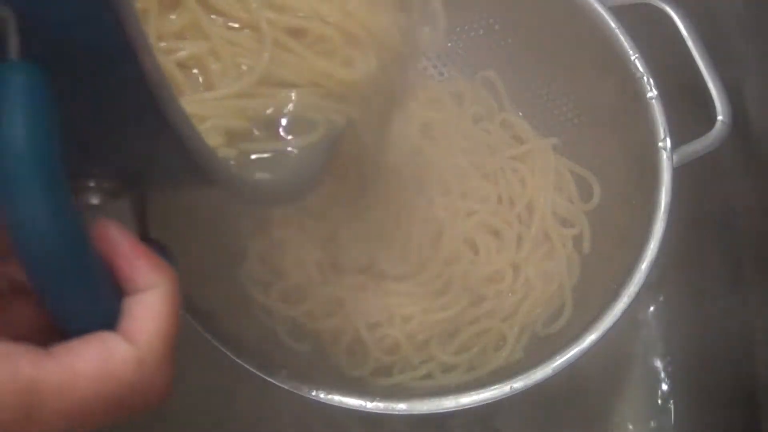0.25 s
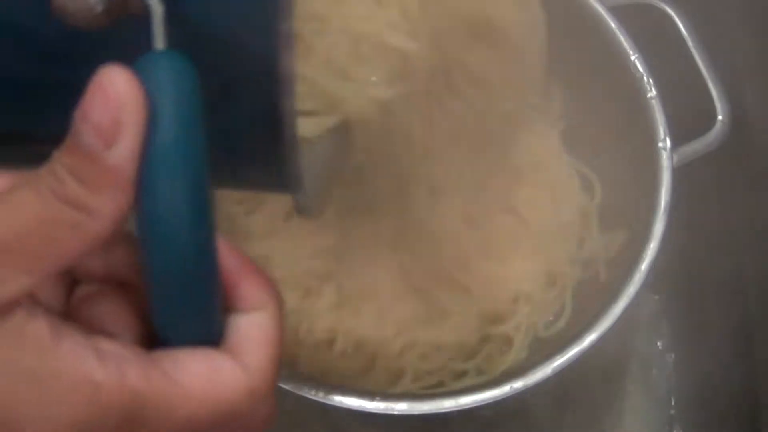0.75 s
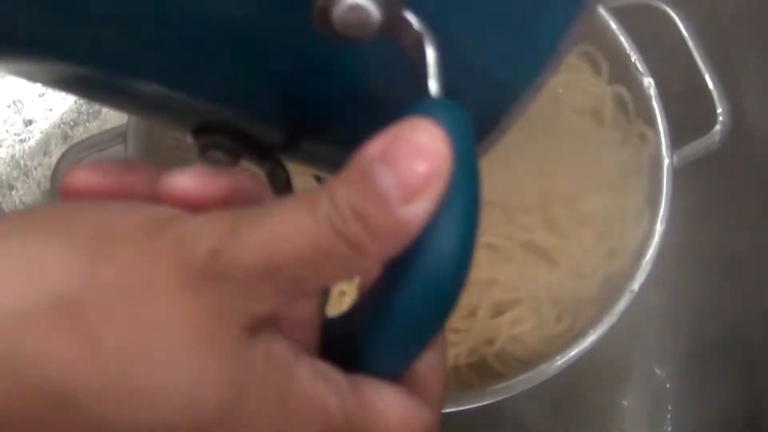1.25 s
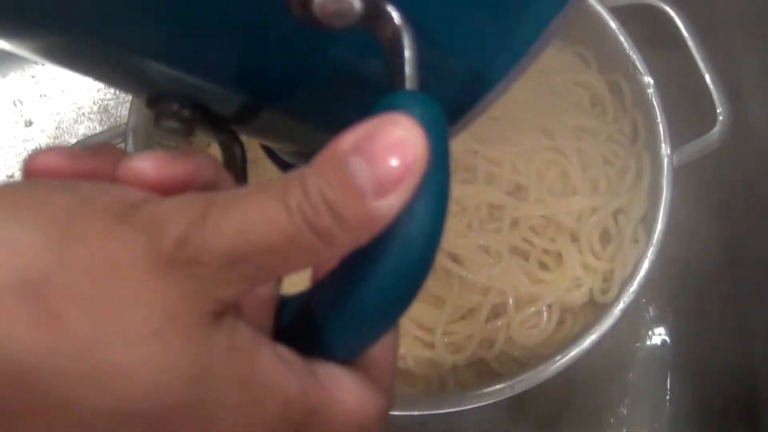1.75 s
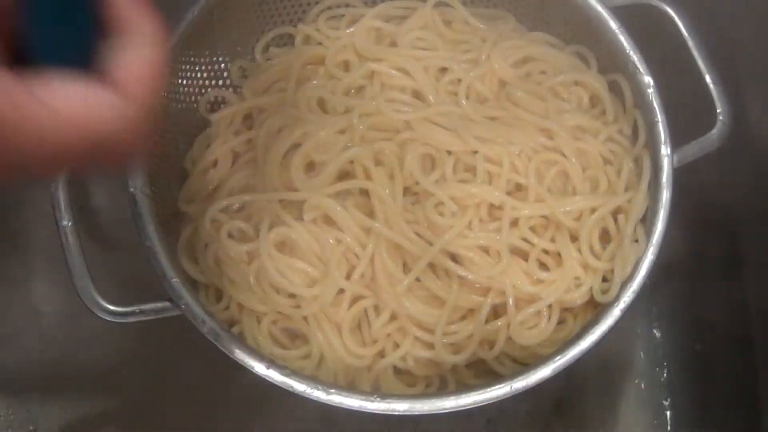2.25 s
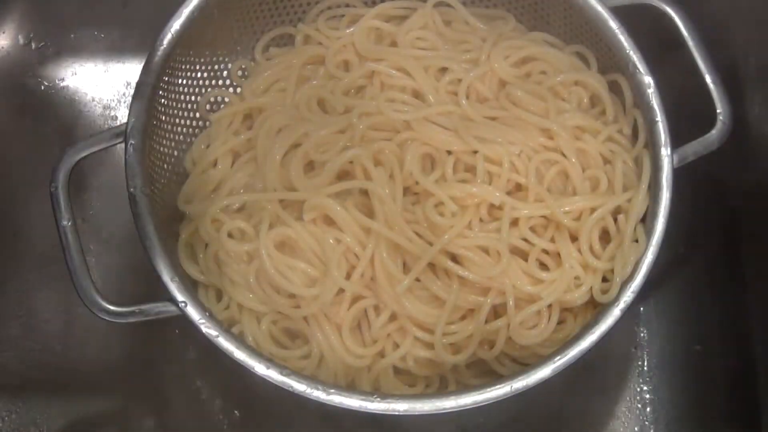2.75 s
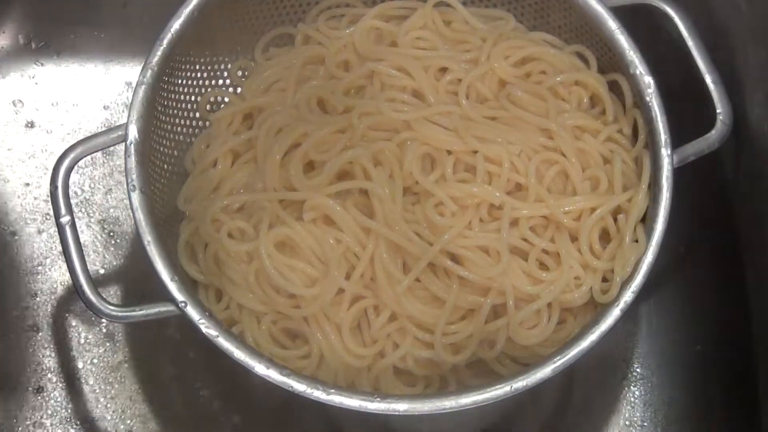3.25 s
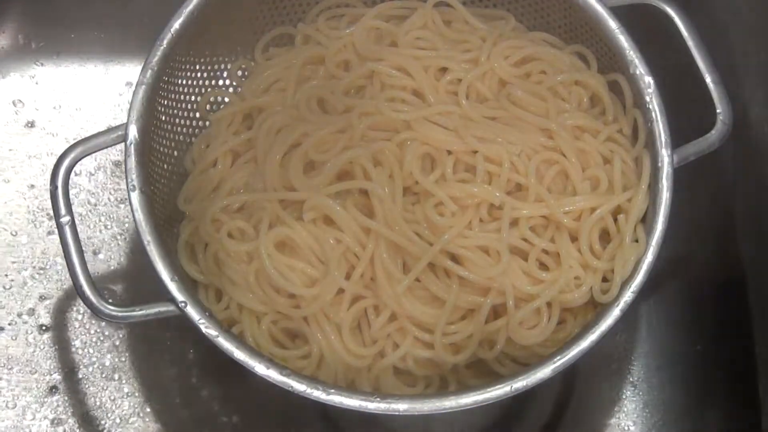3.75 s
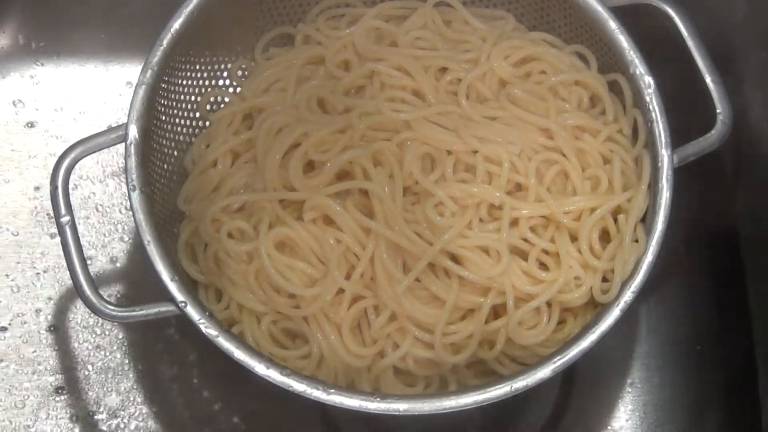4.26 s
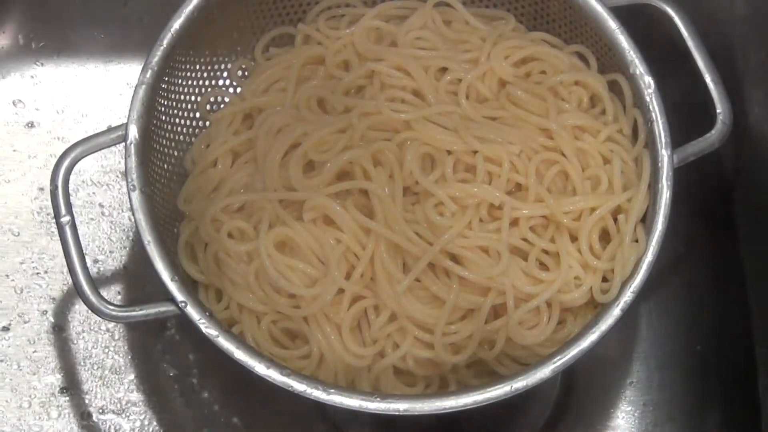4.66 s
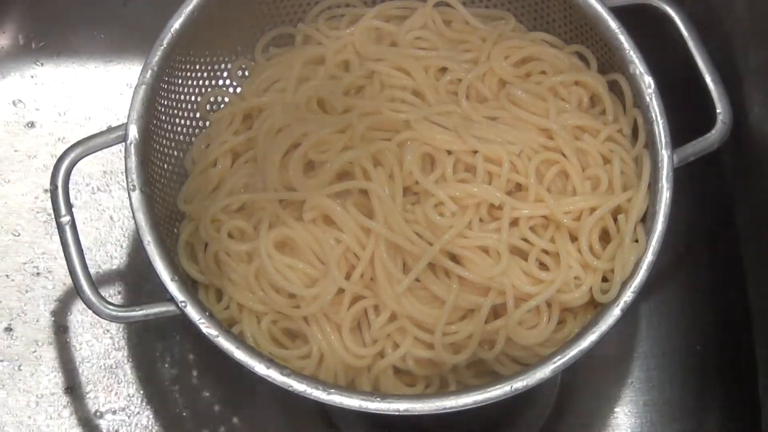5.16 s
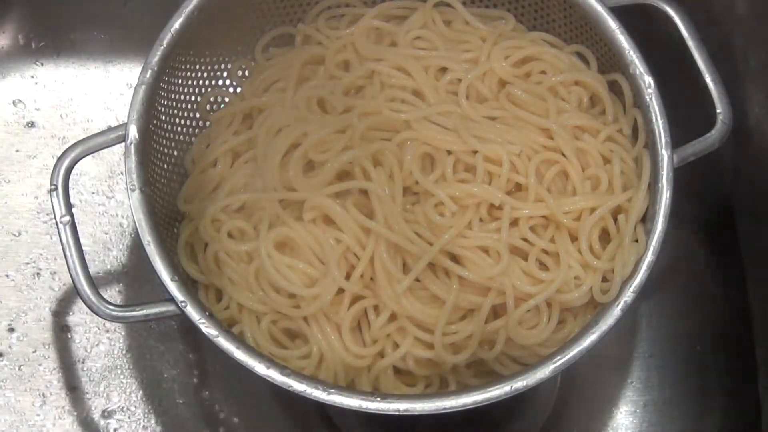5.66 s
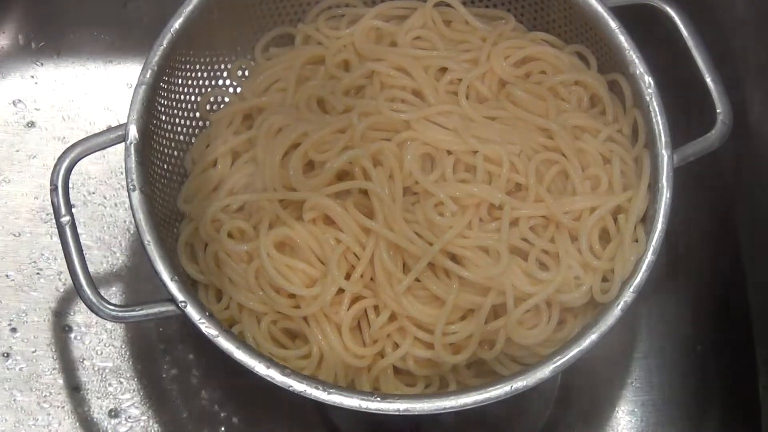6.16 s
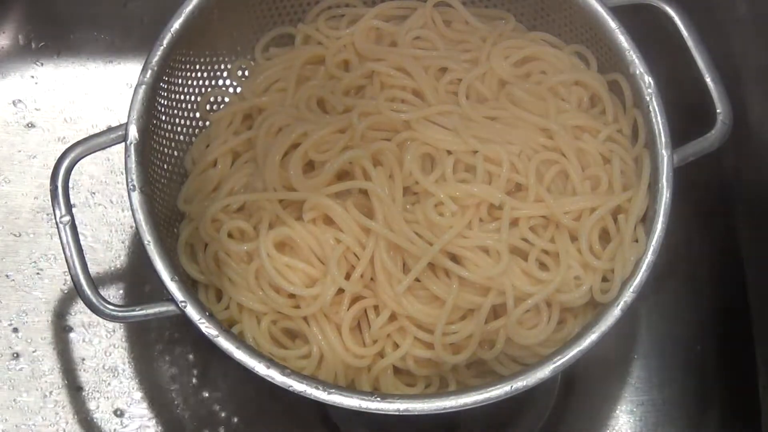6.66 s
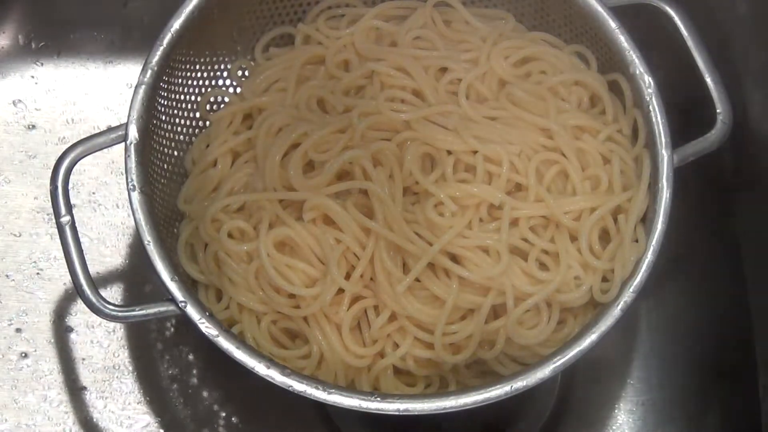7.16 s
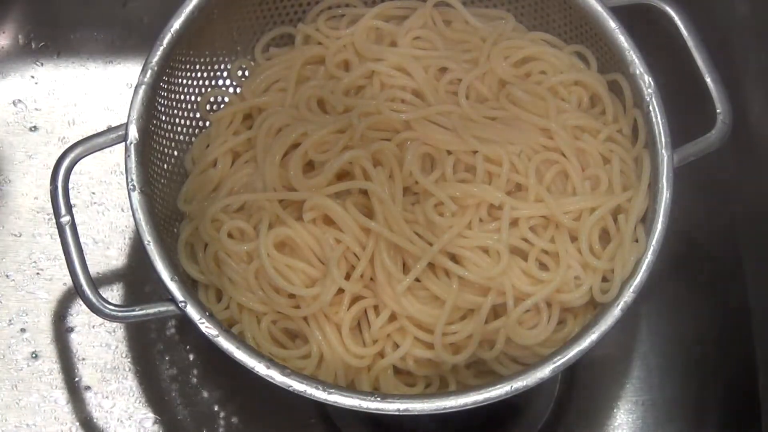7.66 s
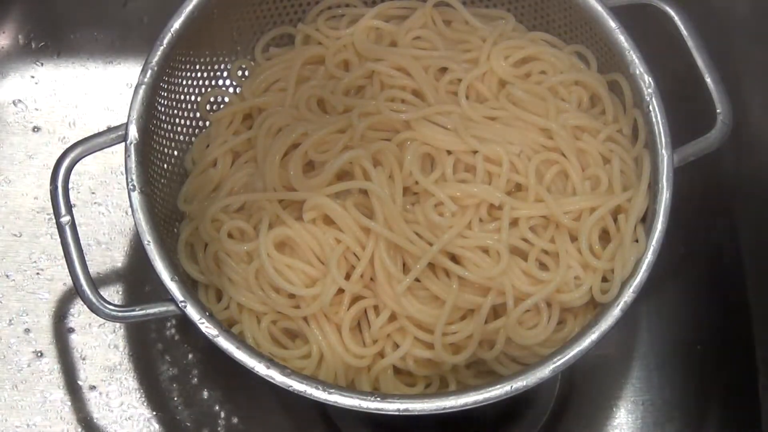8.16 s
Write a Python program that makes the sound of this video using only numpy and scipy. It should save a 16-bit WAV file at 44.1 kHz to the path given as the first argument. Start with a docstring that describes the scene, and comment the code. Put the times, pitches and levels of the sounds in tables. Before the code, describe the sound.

Close splashing as noodles are drained into a metal sink, followed by pattering run-off, a short scrape, faint drips and a pan clank.

```python
"""Hot water and noodles pour from a pot into a colander in a steel kitchen sink, close to one microphone.
The stream splashes, traps bubbles and throws spray; the run-off drums and pings on the thin basin.
At about 4.4 s the pot scrapes down on the counter. Faint dripping and shuffling follow over the
room tone, until a hard knock sets a pan ringing at 8.4 s. A limiter ducks the loudest peaks."""
import sys
import numpy as np
from scipy import signal
from scipy.fft import rfft, irfft, next_fast_len
from scipy.io import wavfile
from scipy.ndimage import uniform_filter1d, minimum_filter1d

SR = 44100
rng = np.random.default_rng(int(sys.argv[2]) if len(sys.argv) > 2 else 0)


def put_to_file(sound):
    """Save the sound as 16-bit audio at rate SR, in the file named by the first command-line argument."""
    columns = np.atleast_2d(sound).T  # one column per channel
    safe = np.clip(columns, -1, 1)
    whole_steps = np.round(safe * 32767)
    wavfile.write(sys.argv[1], SR, whole_steps.astype(np.int16))


N = 371322


def amp(db):
    """Decibels to gain."""
    return 10 ** (np.asarray(db) / 20)


def rms_one(x):
    """Scaled to unit rms."""
    return x / np.sqrt(np.mean(x ** 2) + 1e-20)


def filtered(x, order, hz, kind="band"):
    """Band-pass, or another kind of filter, with edges at hz."""
    return signal.sosfilt(signal.butter(order, hz, kind, fs=SR, output="sos"), x)


def gains(rows):
    """Each dB column of a curve as a gain in time, fading out within 30 ms beyond either end."""
    s, *columns = np.transpose(rows)
    s = np.r_[s[0] - .03, s, s[-1] + .03]
    return [amp(np.interp(np.arange(N) / SR, s, np.r_[-120, db, -120])) for db in columns]


def swells(rows, fall_db_s):
    """Each row climbs 20 dB in its rise time, peaks and dies away; one gain in time per dB column."""
    s, rise_s, *columns = np.transpose(rows)
    since = np.arange(0, N + 40, 40) / SR - s[:, None]
    shape = amp(np.where(since < 0, 20 * since / rise_s[:, None], -fall_db_s * since))
    return [np.interp(np.arange(N) / 40, np.arange(shape.shape[1]), amp(db) @ shape) for db in columns]


def drift(hz):
    """Slow random wander: noise low-passed twice at hz; rms 1."""
    pole = np.exp(-40 * np.pi * hz / SR)
    noise = rng.standard_normal(N // 20 + 4002)   # one value every 20 samples
    slow = signal.lfilter([1], [1, -2 * pole, pole * pole], noise)[4000:]
    return np.interp(np.arange(N) / 20, np.arange(len(slow)), rms_one(slow))


def grains(per_s, spread_db):
    """Random clicks, a few much larger than the rest; rms 1."""
    sizes = amp(spread_db * np.minimum(rng.exponential(1, N), 5)) * rng.choice([-1, 1], N)
    return rms_one(sizes * (rng.random(N) < per_s / SR))


def colour(x, spectrum):
    """Gives a flat input the spectrum of a table; rms 1."""
    size = next_fast_len(N)
    hz, db = np.transpose(spectrum)
    bin_hz = np.maximum(np.arange(size // 2 + 1) * SR / size, 1)
    shape = amp(np.interp(np.log(bin_hz), np.log(hz), db, left=-90, right=-90))
    return rms_one(irfft(rfft(x, size) * shape, size)[:N])


def ring(clicks, hz, t60):
    """A unit click sets a sine of height 1 ringing."""
    decay, angle = amp(-60 / (t60 * SR)), 2 * np.pi * hz / SR
    return signal.lfilter([0, np.sin(angle)], [1, -2 * decay * np.cos(angle), decay ** 2], clicks + 1e-18)


def struck(modes, times, peak_db, scatter_db, contact_s, swell_s=0, spot_hz=None):
    """Every blow reaches each mode at its own moment and strength; modes near spot_hz are favoured."""
    starts, out = (np.asarray(times) * SR).astype(int), np.zeros(N)
    chance = rng.standard_normal((len(starts), 2, len(modes)))
    for k, (hz, db, t60) in enumerate(modes):
        clicks = np.zeros(N + SR)
        strength = amp(peak_db + db + scatter_db * chance[:, 0, k])
        if spot_hz is not None:
            strength *= amp(-8 * np.abs(np.log2(hz / spot_hz)))   # 8 dB less per octave away
        late = (np.abs(chance[:, 1, k]) * contact_s * SR).astype(int)
        clicks[starts + late] = strength * np.sign(chance[:, 1, 0])
        out += ring(clicks[:N], hz, t60)
        if swell_s:
            out -= ring(clicks[:N], hz, min(swell_s, t60 / 2))   # softens the attack
    return out


def pattered(modes, per_s, spread_db, shared):
    """Drops land all over the steel: each mode shares the common drops and has its own too; rms 1."""
    drops = grains(per_s, spread_db) * amp(3.3 * drift(14))   # in clumps
    own = [np.roll(drops, shift) for shift in rng.integers(SR // 4, N, len(modes))]
    return rms_one(sum(amp(db) * ring((shared * drops + near) * rng.standard_normal(N), hz, t60)
                       for (hz, db, t60), near in zip(modes, own)))


def fizz(spectrum, per_s, spread_db, cycles, patchy_db, bed_db):
    """Droplets dealt to ten pitches, each ringing a few cycles, in patches on a bed of hiss; rms 1."""
    drops, dealt, together = grains(per_s, spread_db), rng.integers(0, 10, N), drift(33)
    rings = np.zeros(N)
    for k, hz in enumerate(np.geomspace(spectrum[1][0], spectrum[-2][0], 10)):
        patches = amp(patchy_db * (together + drift(46)))
        rings += patches * rms_one(ring(drops * (dealt == k), hz, cycles / hz)) * np.sqrt(hz)
    bed = amp(bed_db + patchy_db * together) * rng.standard_normal(N)
    return colour(rms_one(rings) + bed, spectrum)


def pops(rows, cycles, splat_s, rise):
    """Each row is a wet splat and a bubble whose pitch climbs as it nears the surface."""
    out, t = np.zeros(N + 1000), np.arange(1000) / SR
    for s, bubble_db, bubble_hz, splat_db, splat_hz in rows:
        start, turns = int(s * SR), bubble_hz * t
        bubble = np.sin(2 * np.pi * turns * (1 + rise * turns / cycles)) * amp(-60 * turns / cycles)
        splat = filtered(rng.standard_normal(len(t)), 2, [splat_hz / 2, splat_hz * 1.32])
        splat *= np.exp(-t / splat_s)
        out[start:start + len(t)] += amp(bubble_db) * bubble + amp(splat_db) * splat
    return out[:N]


# The microphone's hiss and the still kitchen. Each row: frequency in Hz, relative density in dB.
MIC_SPECTRUM = [(1500, -45), (2700, 0), (6500, -5), (9000, -6.5), (11500, -6), (14800, -16), (15900, -3)]
ROOM_SPECTRUM = [(12, -49), (20, -8), (81, -7), (264, 3.5), (369, -8.5), (455, -5), (736, -7.5), (835, -2),
                 (947, -11.5), (1070, -3), (1810, -4), (3000, -20.5), (3900, -55), (6600, -120)]


def room_tone():
    """Low room tone all round, with microphone hiss and a faint steady whine at the top."""
    hiss = amp(-65) * colour(rng.standard_normal(N), MIC_SPECTRUM)
    whine = amp(-79) * rms_one(filtered(rng.standard_normal(N), 2, [15400, 15760]))
    return hiss + whine + amp(-57) * colour(rng.standard_normal(N), ROOM_SPECTRUM)


# Bustle about the kitchen. Each row: time in seconds, rustle level in dB.
BUSTLE_CURVE = [(5.0, -65), (5.25, -60), (5.55, -84), (6.45, -78), (6.8, -56.5), (7.2, -54.5), (7.4, -59),
                (7.8, -56), (8.4, -60)]
# Single steps and moves. Each row: peak time and rise time in seconds, footfall, rustle and swish in dB.
MOVES = [(5.685, 0.0044, -48, -47, -52), (6.06, .02, -70, -64, -67), (6.6, 0.12, -51.5, -56.5, -59),
         (6.85, 0.039, -47.5, -74, -70), (7.045, 0.019, -50, -53, -66), (7.29, 0.13, -55, -63, -63),
         (7.46, 0.05, -49, -57, -61), (7.9, 0.036, -47, -58, -61), (8.155, 0.076, -50, -62, -64)]


def movement():
    """Someone moves about: gains in time for footfall, rustle and swish."""
    bustle, = gains(BUSTLE_CURVE)
    footfall, rustle, swish = swells(MOVES, fall_db_s=172)
    return footfall + amp(0.5) * bustle, rustle + bustle, swish + amp(-2) * bustle


# Feet on the floor and moving cloth. Each row: frequency in Hz, relative density in dB.
FOOT_SPECTRUM = [(24, -53), (40, -20), (86, -37), (108, -13), (168, 4), (199, -9), (271, 2.5), (359, -20.5),
                 (421, -15), (494, -2.5), (750, -45), (980, -54), (1650, -120)]
CLOTH_SPECTRUM = [(350, -74), (600, 16), (728, 4), (850, 12), (1210, 6.5), (1370, 12), (2140, 2.5),
                  (2350, 4), (2800, -28), (3640, -41), (6160, -120)]


def shuffling(footfall, rustle):
    """Soft steps are sparse low bumps; cloth rubs in dense small catches."""
    feet = footfall * colour(grains(per_s=120, spread_db=2), FOOT_SPECTRUM)
    return feet + rustle * colour(grains(per_s=3000, spread_db=2.9), CLOTH_SPECTRUM)


# Steam and trickle in the colander. Each row: time in seconds, level in dB.
TRICKLE_CURVE = [(1.7, -71), (2.4, -70), (3.6, -61.5), (3.75, -58), (4.25, -62), (4.8, -60.5), (5.05, -76)]
# Brief spurts in it. Each row: peak time and rise time in seconds, peak level in dB.
TRICKLE_SPURTS = [(1.86, .04, -64), (2.63, 0.054, -56.5), (2.86, 0.033, -67), (4.1, 0.039, -64),
                  (4.42, 0.06, -44)]
# Its fine, bright fizz. Each row: frequency in Hz, relative density in dB.
TRICKLE_SPECTRUM = [(1350, 2), (2300, -5.5), (2870, -9.5), (3600, -8.5), (4380, -13.5), (6690, -10.5),
                    (15000, 0)]


def trickle(swish):
    """Water seeps off the noodles and stray droplets burst; the swish of movement shares the fizz."""
    level = swish + gains(TRICKLE_CURVE)[0] + swells(TRICKLE_SPURTS, fall_db_s=149)[0]
    seep = fizz(TRICKLE_SPECTRUM, per_s=9000, spread_db=3.6, cycles=6, patchy_db=1, bed_db=-41)
    strays = fizz(TRICKLE_SPECTRUM, per_s=250, spread_db=3.2, cycles=6, patchy_db=0.96, bed_db=-30)
    return level * seep + amp(-67) * strays


# Drops among the noodles. Each row: start in seconds, relative level in dB, pitch in Hz.
NOODLE_DRIPS = [(1.8539, -49, 7010), (1.8818, -48.5, 7080), (2.2709, -46.5, 3840), (2.3562, -50, 7450),
                (2.398, -49, 3840), (2.8185, -48, 3510), (2.8523, -44, 3620), (2.859, -41.5, 4100),
                (2.9753, -46, 3800), (3.122, -46, 4650), (3.778, -54, 4060), (4.1084, -47, 5900),
                (4.412, -43, 3950), (5.781, -50, 6900), (6.0563, -44, 4060), (7.383, -44, 6500),
                (7.518, -42, 4180), (7.871, -35, 3880), (7.895, -45, 3760), (7.971, -50.5, 7030),
                (8.058, -45, 3520), (8.168, -48, 3630), (8.3015, -46, 8050)]


def drips():
    """Single drops burst with a tiny high bubble and a splat."""
    s, db, hz = np.transpose(NOODLE_DRIPS)
    bursts = np.c_[s, db - 4, hz, db + 1.5, 1.1 * hz]
    return pops(bursts, cycles=45, splat_s=0.004, rise=0.15)


# A wet swish close by. Its row: peak time and rise time in seconds, peak level in dB.
SQUELCH_SWELL = [(7.57, 0.075, -41)]
# Its colour. Each row: frequency in Hz, relative density in dB.
SQUELCH_SPECTRUM = [(350, -40), (600, -10), (812, -2.5), (1510, -5.5), (1910, -1.5), (2130, -6),
                    (2660, 0.5), (2880, -5), (3510, -4), (14000, -20)]


def squelch():
    """One soft swell of hiss and droplets."""
    level, = swells(SQUELCH_SWELL, fall_db_s=124)
    return level * fizz(SQUELCH_SPECTRUM, per_s=5000, spread_db=1.7, cycles=11, patchy_db=0.58, bed_db=5)


# The pot dragged onto the counter. Each row: time in seconds, rumble in dB, rasp in dB.
SCRAPE_CURVE = [(4.3, -58, -64), (4.338, -38, -53.5), (4.418, -22.5, -26), (4.485, -23, -37),
                (4.512, -36.5, -46), (4.62, -45, -56)]
# The colours of the scrape. Each row: frequency in Hz, relative density in dB.
RUMBLE_SPECTRUM = [(71, -29), (120, -23), (276, -1.5), (429, -15), (491, -7.5), (864, -14), (1010, -62),
                   (1400, -18), (1820, -42), (3080, -120)]
RASP_SPECTRUM = [(710, -44), (1200, -8), (1670, 9), (2000, 1), (2180, -12), (2970, -5), (3420, -11.5),
                 (4010, -8.5), (5200, -38), (6500, -27), (13000, -60)]


def pot_scrape():
    """The rim skids in dense uneven slips."""
    rumble, rasp = gains(SCRAPE_CURVE)
    slips = grains(per_s=2500, spread_db=2.2) * amp(1.5 * drift(64))
    return rumble * colour(slips, RUMBLE_SPECTRUM) + rasp * colour(np.roll(slips, SR), RASP_SPECTRUM)


# A blow on the pan and its bounces. Each row: start in seconds, level in dB.
PAN_BLOWS = [(8.3945, -8), (8.3985, -20), (8.4015, -20), (8.410, -15)]
# The pan's modes. Each row: frequency in Hz, relative level in dB, seconds to fall 60 dB.
PAN_MODES = [(140, -14, .2), (280, -2, .1), (388, -2, .6), (535, -8, .2), (727, -7, .3), (860, -8, .05),
             (970, -9, .3), (1357, 1, .8), (1997, 0, .06), (2385, -10, .04), (3149, -14, .3),
             (3618, -9, .05), (4231, -15, .1), (4533, -14, .04), (5626, -11, .05), (6428, -13, .08),
             (8500, -26, .05), (11000, -30, .05)]


def pan_knock():
    """The pan rings, and its rim rattles on what it hits."""
    s, blow_db = np.transpose(PAN_BLOWS)
    since = np.arange(N) / SR - s[0]
    fade = (since > 0) * amp(-15.5 - 170 * np.maximum(since, 0))
    rattle = filtered(fade * grains(per_s=5600, spread_db=5), 2, [700, 7500])
    pan = struck(PAN_MODES, s, blow_db, scatter_db=0.48, contact_s=0.00035, swell_s=0.0015)
    return filtered(pan, 3, 110, "high") + rattle   # the knock carries no deep bass


# Run-off under the colander. Each row: time in seconds, drumming in dB, metallic ring in dB.
RUNOFF_CURVE = [(0.0, -34, -40), (0.55, -29.5, -41.5), (0.8, -39, -37), (0.99, -30.5, -42),
                (1.32, -41, -40.5), (1.55, -31.5, -43), (1.9, -40.5, -45), (2.15, -25.5, -41.5),
                (2.45, -40.5, -44.5), (2.7, -36, -41.5), (3.0, -36, -47.5), (3.43, -31, -38),
                (3.58, -41, -46.5), (3.81, -34, -44.5), (4.2, -40, -43.5), (4.47, -33, -40),
                (4.6, -44.5, -44), (4.76, -49.5, -52), (5.45, -68, -76)]
# Heavy gushes that thump the sink. Each row: time in seconds, relative level in dB.
BASIN_GUSHES = [(0.124, -15), (0.211, -19.5), (0.285, -21), (0.342, -16.5), (0.438, -27), (0.478, -17),
                (0.546, -17), (0.615, -19), (0.801, -20), (0.845, -13.5), (0.909, -18.5), (0.975, -18.5),
                (1.09, -23), (1.249, -18), (1.385, -14.5), (1.477, -22), (1.533, -14), (1.828, -16),
                (2.093, -9.5), (2.208, -20), (2.296, -15.5), (2.51, -9.5), (2.614, -19), (2.68, -20),
                (2.864, -21), (2.965, -19.5), (3.231, -31), (3.367, -10), (3.446, -18), (3.544, -15.5),
                (3.621, -19), (3.697, -20.5), (3.755, -18), (3.848, -16.5), (4.294, -18), (4.358, -12),
                (4.437, -14), (4.652, -14), (4.667, -15.5)]
# Hard drops on the steel. Each row: start in seconds, relative level in dB, favoured pitch in Hz.
HARD_DROPS = [(0.788, -27.5, 622), (1.837, -28, 856), (1.973, -27.5, 850), (2.066, -19, 931),
              (2.088, -17.5, 800), (2.192, -21.5, 861), (2.268, -39, 842), (2.51, -17, 845),
              (2.697, -38, 851), (2.726, -25, 864), (2.796, -24, 834), (2.867, -28.5, 875),
              (2.945, -31, 848), (2.973, -24.5, 860), (3.151, -28.5, 840), (3.237, -25.5, 842),
              (3.365, -24, 953), (3.385, -18.5, 980), (3.414, -33, 864), (3.451, -17, 875),
              (3.545, -30, 536), (3.622, -27, 905), (3.727, -19.5, 880), (3.866, -27.5, 860),
              (3.894, -23, 850), (3.994, -38, 867), (4.082, -24.5, 850), (4.295, -24, 836),
              (4.481, -16, 860)]
# Low modes of the basin's panels, then higher ones of its walls and the colander.
# Each row: frequency in Hz, relative level in dB, seconds to fall 60 dB.
PANEL_MODES = [(133.8, -6.5, 0.25), (140.6, -1.5, 0.14), (192, 0, 0.063), (216.9, -0.5, 0.16),
               (267, -8.5, 0.095)]
WALL_MODES = [(419.4, -11, 0.083), (511, -9, 0.048), (541.8, -4, 0.084), (838, -3, 0.11),
              (856.6, -3.5, 0.13), (887, -6, 0.071), (963, -5.5, 0.035), (1053, -19, 0.13),
              (1119.5, -13, 0.17), (1176, -9, 0.044), (1640, -13.5, 0.061), (1984, -13, 0.032)]


def basin():
    """Thin steel drummed and pinged by the water that runs through the colander."""
    drumming, ringing = gains(RUNOFF_CURVE)
    swell_s, lead_s = 0.008, 0.004   # water lands softly, so the ring builds gently; gushes are struck a few ms ahead of their listed times
    gush_s, gush_db = np.transpose(BASIN_GUSHES)
    panels = drumming * pattered(PANEL_MODES, per_s=400, spread_db=1.8, shared=0.8)
    panels += struck(PANEL_MODES, gush_s - lead_s, gush_db - 9.5,
                     scatter_db=2.75, contact_s=0.0012, swell_s=swell_s)
    drop_s, drop_db, spot_hz = np.transpose(HARD_DROPS)
    walls = ringing * pattered(WALL_MODES, per_s=500, spread_db=2.8, shared=0.6)
    walls += struck(WALL_MODES, drop_s, drop_db - 2.5,
                    scatter_db=2.5, contact_s=0.0015, swell_s=swell_s, spot_hz=spot_hz)
    # each hard drop has two smaller ones close behind
    follower_s = (drop_s[:, None] + rng.uniform(0.008, 0.06, (len(drop_s), 2))).ravel()
    walls += struck(WALL_MODES, follower_s, np.repeat(drop_db, 2) - 16.5,
                    scatter_db=4, contact_s=0.001, swell_s=swell_s)
    panels = filtered(panels, 7, [113, 380])   # small panels radiate nothing below their lowest mode
    # a heavy drop at 2.09 s shakes the counter
    thud = struck([(55, 0, 0.13)], drop_s[4:5], drop_db[4:5] - 24, scatter_db=0, contact_s=0)
    return thud + panels + filtered(walls, 3, [400, 2200])


# The stream in the sink. Each row: time in seconds, splash in dB, spray in dB against the splash.
POUR_CURVE = [(0.0, -44, 6), (0.25, -40, -2.5), (0.3, -49, 4), (0.57, -46, 1.5), (0.62, -37.5, 0),
              (1.17, -39.5, -4.5), (1.28, -44, -1), (1.484, -54, 1.5), (1.62, -56, 3.5), (1.79, -69, -8)]
# Clumps of noodles dropping. Each row: peak time and rise time in seconds, splash level in dB.
NOODLE_SURGES = [(0.128, 0.043, -48), (0.588, 0.019, -42), (1.212, 0.061, -35)]
# The colours of splash and fine spray. Each row: frequency in Hz, relative density in dB.
SPLASH_SPECTRUM = [(590, 7.5), (1000, -35), (1200, -8.5), (1720, 0.5), (2730, -8), (3020, 1), (3290, -8),
                   (6500, -18.5), (8450, -14), (14300, -120)]
SPRAY_SPECTRUM = [(3240, 2), (5500, -6.5), (6940, -3), (8710, -13), (11700, -11), (14600, -19.5),
                  (15700, -20)]
# Sharp spits of spray. Each row: start in seconds, relative level in dB.
SPRAY_SPITS = [(0.105, -34), (0.319, -33), (0.48, -34), (0.602, -28), (0.734, -31), (0.965, -30),
               (1.116, -42), (1.493, -39), (1.585, -42), (1.608, -43)]
# Slaps of water. Each row: start in seconds, bubble in dB, its pitch in Hz, splat in dB, its band in Hz.
WATER_SLAPS = [(0.130, -21, 1680, -19, 5800), (0.158, -30, 3830, -31, 3830),
               (0.2418, -22.5, 2660, -19, 3900), (0.272, -40, 1760, -22, 6190),
               (0.5088, -37, 1730, -30, 10800), (0.5827, -23.5, 1520, -22, 4230),
               (0.635, -23, 1710, -22.5, 5940), (0.6640, -18, 1650, -29, 2400),
               (0.7342, -20, 1620, -37, 3600), (0.7558, -22, 1630, -16.5, 5900),
               (0.7884, -29, 1710, -21, 3850), (0.8257, -25, 3940, -18.5, 4380),
               (0.8400, -25, 3130, -22, 4000), (0.8909, -20, 2120, -23, 3500),
               (0.943, -22, 1640, -21, 6160), (0.978, -21, 1440, -30, 3600), (1.0575, -24, 1690, -41, 3710),
               (1.0854, -26, 1820, -17, 3470), (1.1434, -23.5, 1640, -23.5, 5050),
               (1.1715, -34, 1660, -21, 3800), (1.2052, -22, 2950, -36, 3730),
               (1.216, -26, 2950, -38, 3700), (1.226, -21, 3000, -34, 3700), (1.2065, -38, 1500, -19, 2200),
               (1.333, -27.5, 1170, -38, 3000), (1.4874, -37, 3060, -33, 4340),
               (1.5956, -37.5, 2340, -34.5, 6950)]


def pour():
    """Close to the microphone the stream hits noodles and steel, traps bubbles and throws spray."""
    stream, spray_share = gains(POUR_CURVE)
    surge, = swells(NOODLE_SURGES, fall_db_s=365)
    when, size, pitch, bright = rng.random((450, 4)).T   # 450 bubbles in the first 1.8 s
    trapped = np.c_[1.8 * when, 13 * size - 1, 1350 * 3.2 ** pitch ** 1.5,
                    14 * size - 16, 2500 * 4 ** bright]
    spray = fizz(SPRAY_SPECTRUM, per_s=6000, spread_db=4, cycles=21, patchy_db=3.6, bed_db=-2)
    spray *= (stream + amp(1) * surge) * spray_share
    splash = fizz(SPLASH_SPECTRUM, per_s=1500, spread_db=2, cycles=9, patchy_db=1.5, bed_db=-6)
    bubbles = pops(trapped, cycles=28, splat_s=0.009, rise=0.15)
    spit_rows = [(s, db - 13, 9000, db + 0.5, 11000) for s, db in SPRAY_SPITS]
    spits = pops(spit_rows, cycles=15, splat_s=0.0029, rise=0.1)
    slaps = pops(WATER_SLAPS, cycles=32, splat_s=0.0054, rise=0.18)
    return (stream + surge) * (splash + bubbles) + spray + spits + slaps


def scene():
    """The sink and the kitchen around it, at one microphone."""
    footfall, rustle, swish = movement()
    sink = pour() + basin()
    kitchen = pot_scrape() + shuffling(footfall, rustle)
    draining = drips() + trickle(swish) + squelch()
    return (sink + kitchen + draining + room_tone() + pan_knock())[None]


def record(dry):
    """A limiter that looks ahead ducks just before loud peaks; then the top is cut."""
    ceiling_db, recovery_db_s, ahead_s, stop_hz = -11.5, 300, 0.012, 15950
    over_db = np.maximum(20 * np.log10(np.abs(dry[0]) + 1e-9) - ceiling_db, 0)
    recovery = recovery_db_s * np.arange(N) / SR
    held_db = np.maximum.accumulate(over_db + recovery) - recovery
    early_db = -minimum_filter1d(-held_db, size=2 * int(ahead_s * SR) + 1)
    limited = dry * amp(-uniform_filter1d(early_db, size=64))
    return signal.sosfilt(signal.cheby2(20, 50, stop_hz, fs=SR, output="sos"), limited)


dry = scene()
out = record(dry)
put_to_file(out)
```